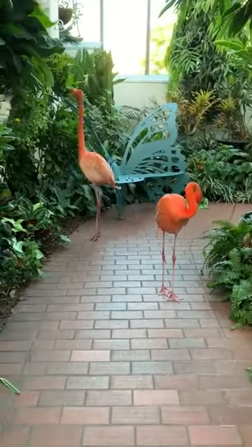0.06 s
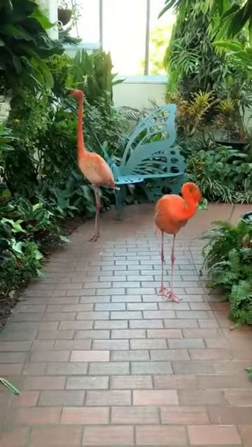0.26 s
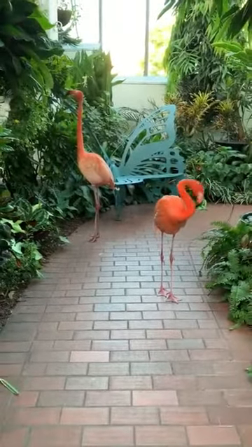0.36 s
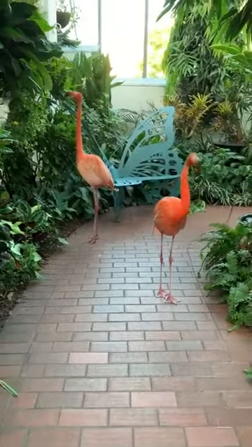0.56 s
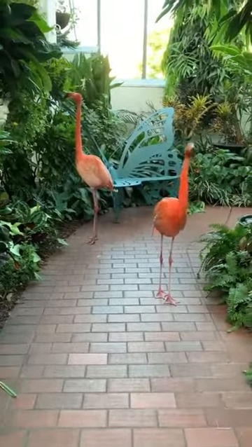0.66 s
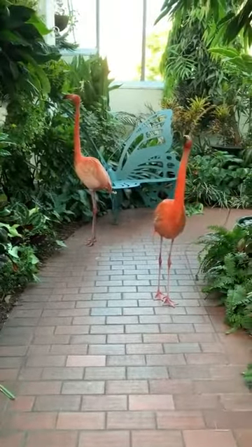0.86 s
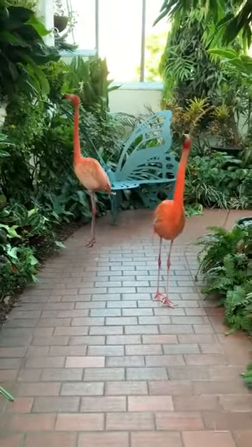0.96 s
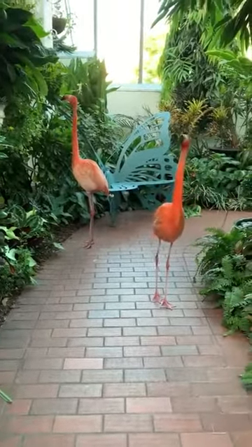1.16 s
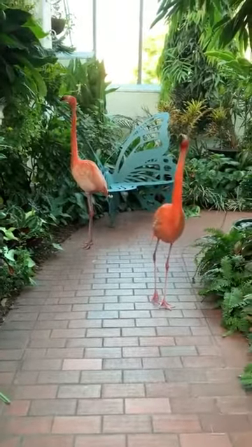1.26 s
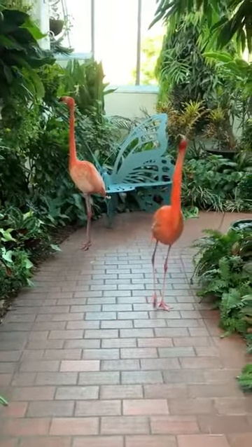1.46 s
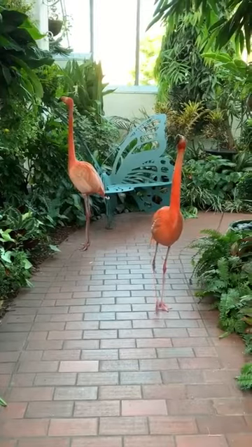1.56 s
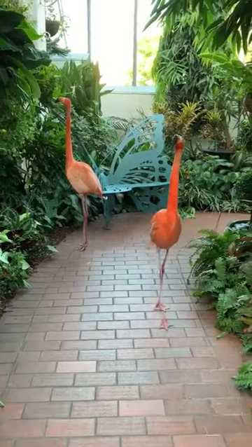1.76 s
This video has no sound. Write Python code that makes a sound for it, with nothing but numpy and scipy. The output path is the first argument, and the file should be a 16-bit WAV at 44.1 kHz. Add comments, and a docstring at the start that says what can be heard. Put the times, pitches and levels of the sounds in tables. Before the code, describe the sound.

A flamingo gives one harsh, reedy honk in three quick parts, a few metres away and slightly right. The call echoes around a glass conservatory, leaving steady ventilation, faint distant chirps and two soft dry rustles.

```python
"""A flamingo gives one harsh three-part honk in a glass conservatory, a few metres from a stereo mic.
Each syllable is a reedy tone shaken by a slower flutter, which breaks into rasp and hiss as the bird
pushes harder and lets go with a grunt. Plants and paving scatter the call, the hall rings and the walls
echo it, over a bed of steady ventilation, distant chirps and two faint dry rustles."""
import sys
import numpy as np
from scipy import signal
from scipy.fft import rfft, irfft
from scipy.io import wavfile

SR = 44100
rng = np.random.default_rng(int(sys.argv[2]) if len(sys.argv) > 2 else 0)


def master(y):
    """Save y as 16-bit WAV."""
    cut = np.clip(np.atleast_2d(y).T, -1, 1)
    pcm = np.round(cut * 32767)  # scale
    wavfile.write(sys.argv[1], SR, pcm.astype(np.int16))


N = 79380
TIME, FREQS = np.arange(N) / SR, np.fft.rfftfreq(N, 1 / SR)

# ventilation spectrum (frequency [Hz], relative level [dB])
VENT_EQ = [(15, -8), (35, -7), (58, 1.5), (85, -8.5), (118, -3.5), (170, -14), (260, -17), (480, -23),
           (1000, -25), (1800, -27), (3800, -32.5), (5600, -36.5), (6050, -29.5), (6600, -38.5),
           (7200, -21.5), (7700, -43.5), (8900, -40), (11500, -44.5), (15800, -42.5)]
# small birds far off (start [s], length [s], pitch [Hz], width [Hz], level [dB])
FAR_CHIRPS = [(.0, 0.23, 5880, 204, -46.5), (0.104, 0.16, 5300, 310, -43.5),
              (0.783, 0.17, 5670, 444, -46.5), (1.259, 0.1, 5290, 346, -41), (1.498, 0.26, 6130, 170, -43),
              (1.698, 0.12, 5340, 200, -46)]
# the honk's three parts (start [s], peak [s], end [s], swell [dB], pitch [Hz], sag [share/s],
# tone [dB], rasp [dB], hiss [dB], bite [dB], rasp lag [s])
HONK_SYLLABLES = [(0.224, 0.268, 0.3, -0.5, 1335, .05, -27, -23.5, -30, -21.5, 0.002),
                  (0.337, 0.394, 0.4216, 24, 1214, .1, -14, -21.5, -16.5, -12, 0.036),
                  (0.499, 0.564, 0.587, 14, 1194, 0.55, -13, -23.5, -24.5, -23.5, 0.0028)]
# reedy partials the throat brings out, one list per syllable (frequency [Hz], level [dB])
REED_PARTIALS = [
    [(1230, -31), (1655, -39), (2530, -30), (2675, -34), (3295, -40), (4160, -40), (4592, -38), (5103, -42)],
    [(805, -38), (1072, -32), (1340, -25), (1615, -29), (1740, -30), (2019, -38), (2406, -26), (2832, -28),
     (4188, -35), (4576, -30), (4710, -28)],
    [(800, -37), (1063, -31), (1325, -31), (1560, -37), (2010, -33), (2388, -25), (3205, -33), (4118, -33),
     (4750, -33), (5975, -41)],
]
# resonances of the bite that opens each syllable (frequency [Hz], width [Hz], level [dB])
BITE_RESONANCES = [(1278, 110, -0.5), (2852, 160, -0.5)]
# throat resonances (frequency [Hz], width [Hz], relative level [dB])
THROAT_FORMANTS = [(634, 100, -2.5), (790, 150, 0.5), (1138, 73, 13.5), (1356, 39, 3), (1663, 294, 4.5),
                   (2100, 91, 4.5), (2460, 220, 6.5), (2840, 35, -22), (3370, 31, 4.5), (4060, 73, -19),
                   (4520, 43, 0.5), (5930, 930, -5)]
# hiss from the open bill (frequency [Hz], relative level [dB])
BILL_EQ = [(150, -0.5), (450, 3), (700, 2), (2000, 9), (4500, 9.5), (5500, -8.5), (7600, 8), (8050, -6.5),
           (8700, 4.5), (12000, -1.5), (15800, -6)]
# reverb of the hall (frequency [Hz], T60 [s])
HALL_DECAY = [(200, 5.6), (1200, 0.57), (2500, 0.99), (5000, 0.4), (9000, 0.61), (16000, 0.086)]
# echoes off the glass walls (delay [s], level [dB])
WALL_ECHOES = [(.058, -10), (.1, -14), (.275, -16.5), (.33, -23), (.41, -24)]
# throaty notes as each syllable lets go (start [s], length [s], from [Hz], to [Hz], level [dB])
RELEASE_GRUNTS = [(.266, .07, 935, 980, -32), (.445, .075, 1010, 880, -36), (.612, .11, 985, 850, -37)]
# dry rustles (start [s], length [s], level [dB])
DRY_RUSTLES = [(.94, .14, -55), (1.45, .3, -57)]
# rustle spectrum (frequency [Hz], relative level [dB])
RUSTLE_EQ = [(3000, -25), (7000, -8), (8600, 0), (11500, -4), (15500, -8)]
# stereo width by frequency; near 5 kHz the centre drops out, leaving only the sides
# (frequency [Hz], side minus mid [dB])
STEREO_WIDTH = [(60, -52), (115, -81), (200, -20.5), (380, -4), (700, 3.5), (1250, -2.5), (2400, 4),
                (4000, 1), (4500, 5), (5000, 38), (5550, 2), (6100, 0.5), (7400, -11), (8000, -4.5),
                (9200, -2), (10500, 3), (12000, 0), (12700, 11), (13500, -6), (15500, 0)]

FLUTTER_HZ, FLUTTER_DEPTH = 134, .15
ATTACK_S, RELEASE_S, FADE_DB = .0038, .023, 6


def amp(db):
    """Decibels to gain."""
    return 10 ** (np.asarray(db) / 20)


def unit(x):
    """Normalises to rms 1."""
    return x / np.sqrt(np.mean(x ** 2) + 1e-20)


def curve_at(points, hz):
    """Reads a curve on a log-frequency axis."""
    freqs, values = np.transpose(points)
    return np.interp(np.log(hz + 1), np.log(freqs + 1), values)


def equalise(x, points):
    """Shapes x with an EQ curve."""
    return irfft(rfft(x) * amp(curve_at(points, FREQS)), N)


def wander(hz):
    """Random drift of rms 1, rolling off above hz."""
    return unit(irfft(rfft(rng.standard_normal(N)) / (1 + (FREQS / hz) ** 2), N))


def resonate(x, hz, width):
    """Rings x through a steep resonance, normalised to rms 1."""
    carrier = np.exp(2j * np.pi * hz * TIME)
    pole = np.exp(-np.pi * width * np.sqrt(2) / SR)
    baseband = signal.lfilter([(1 - pole) ** 2], [1, -2 * pole, pole ** 2], x / carrier)
    return unit((carrier * baseband).real)


def arch(start, length):
    """A soft half-sine swell and fade."""
    return np.sin(np.pi * np.clip((TIME - start) / length, 0, 1))


def ventilation(level_db=-33.5, crossover_hz=250, rumble_waver_db=1.2, air_waver_db=.5):
    """Moving air: a lumpy rumble under an even hiss from all sides."""
    air = unit(equalise(rng.standard_normal((2, N)), VENT_EQ))
    lows = signal.sosfiltfilt(signal.butter(2, crossover_hz, fs=SR, output="sos"), air)
    rumble = lows * amp(rumble_waver_db * wander(3.7))
    hiss = (air - lows) * amp(air_waver_db * wander(13))
    return amp(level_db) * (rumble + hiss)


def chirp(start, length, hz, width, db):
    """A small bird's thin note, blurred by the hall into a narrow band of noise."""
    band = np.array([resonate(noise, hz, width) for noise in rng.standard_normal((2, N))])
    return amp(db) * arch(start, length) * band


def effort(start, peak, end, swell_db):
    """The bird's push: starts (softly, if it has far to grow), swells, sags and lets go."""
    attack = np.clip((TIME - start) / ATTACK_S / max(swell_db, 1), 0, 1)
    body = amp(np.interp(TIME, [start, peak, end], [-swell_db, 0, -FADE_DB]))
    release = np.exp(-np.maximum(TIME - end, 0) / RELEASE_S)
    return attack * body * release


def reed(hz, flutter_cycles):
    """A tone on the pitch curve hz; the flutter shakes it into sidebands."""
    shake = 1 + FLUTTER_DEPTH * np.sin(2 * np.pi * flutter_cycles)
    return np.sqrt(2) * shake * np.cos(2 * np.pi * (np.cumsum(hz) / SR + rng.random()))


def puffs(flutter_cycles, rough, open_share, leak):
    """One slap and one puff of air per flutter cycle; rough crossfades from slap to air."""
    slaps = np.diff(np.floor(flutter_cycles), prepend=0)
    air = (leak + np.exp(-(flutter_cycles % 1) / open_share)) * rng.standard_normal(N)
    return (1 - rough) * unit(slaps) + rough * unit(air)


def bite(drive, start, decay_s=.035):
    """The syllable's hard front edge: puffs ring two resonances and quickly fade."""
    ring = sum(amp(db) * resonate(drive, hz, width) for hz, width, db in BITE_RESONANCES)
    return ring * np.exp(-np.maximum(TIME - start, 0) / decay_s)


def throat_rasp(drive):
    """Puffs coloured by all the resonances of the throat."""
    power = sum((amp(db) / (1 + 2 * ((FREQS - hz) / width) ** 2)) ** 2
                for hz, width, db in THROAT_FORMANTS)
    return unit(irfft(rfft(drive) * np.sqrt(power), N))


def bill_hiss(flutter_cycles, flicker_db=1.5):
    """Breath pulsing out through the open bill."""
    breath = puffs(flutter_cycles, rough=.8, open_share=.5, leak=.5)
    return unit(equalise(breath, BILL_EQ)) * amp(flicker_db * wander(200))


def syllable(start, peak, end, swell_db, pitch_hz, sag, tone_db, rasp_db, hiss_db, bite_db, lag_s,
             partials, jitter=.005, waver_db=2.2, full_lag_hz=4500):
    """Bite and tone lead; partials (the higher, the later), rasp and hiss follow as the pitch sags."""
    def push(lag_share, swell_share):
        """The effort curve with its peak delayed and its swell scaled."""
        delay = lag_share * lag_s
        return effort(start, peak + delay, end + delay / 2, swell_share * swell_db)

    bend = 1 - sag * (np.clip(TIME, start, end + RELEASE_S) - peak)
    bend *= 1 + jitter * wander(45)
    flutter_cycles = np.cumsum(FLUTTER_HZ * bend * (1 + .06 * wander(150))) / SR
    voice = amp(tone_db) * reed(pitch_hz * bend, flutter_cycles) * push(0, 1)
    for hz, db in partials:
        gain = amp(db + waver_db * wander(25))
        voice += gain * reed(hz * bend, flutter_cycles) * push(min(hz / full_lag_hz, 1), .47)
    drive = puffs(flutter_cycles, rough=.55, open_share=.3, leak=.35)
    voice += amp(bite_db) * bite(drive, start) * push(0, .24)
    voice += amp(rasp_db) * throat_rasp(drive) * push(1, .15)
    voice += amp(hiss_db) * bill_hiss(flutter_cycles) * push(1, .74)
    return voice


def reflections(t60_curve, delay_s):
    """A dense mid/side tail of energy 1 per channel, dying away as the T60 curve says."""
    hz, t, bands = signal.stft(rng.standard_normal((2, N)), SR, nperseg=256)
    decay = amp(-60 * t / curve_at(t60_curve, hz)[:, None])
    tail = signal.istft(bands * decay, SR, nperseg=256)[1]
    tail /= np.linalg.norm(tail, axis=1, keepdims=True)
    return np.pad(tail, ((0, 0), (int(delay_s * SR), 0)))[:, :N]


def conservatory(call, scatter_db=-2.5, scatter_t60=.26, hall_db=-7.5, echo_t60=.07, echo_top_hz=3500):
    """Direct call, scatter off plants and paving, hall reverb and dull wall echoes, as mid/side."""
    echoes = sum(amp(db) * reflections([(1, echo_t60)], delay) for delay, db in WALL_ECHOES)
    echoes = signal.lfilter(*signal.butter(1, echo_top_hz, fs=SR), echoes)
    scatter = amp(scatter_db) * reflections([(1, scatter_t60)], delay_s=.003)
    hall = amp(hall_db) * reflections(HALL_DECAY, delay_s=.02)
    wet = signal.fftconvolve(call[None], scatter + hall + echoes, axes=1)[:, :N]
    # the call sounds a little louder on the right, and ahead in phase there
    side = -.086 * call + .84 * signal.hilbert(call).imag
    return np.array([call, side]) + wet


def grunt(start, length, from_hz, to_hz, db, jitter=.05):
    """An unsteady low note that slides as the throat relaxes."""
    slide = np.interp(TIME, [start, start + length], [from_hz, to_hz])
    hz = slide * (1 + jitter * wander(120))
    return amp(db) * arch(start, length) * reed(hz, FLUTTER_HZ * TIME)


def whistle(hz=5910, width_hz=19, level_db=-26, length_s=.041):
    """A narrow resonance shrills at the height of the middle syllable, the hardest push."""
    _, peak, *_, lag_s = HONK_SYLLABLES[1]
    shrill = resonate(rng.standard_normal(N), hz, width_hz)
    return amp(level_db) * shrill * arch(peak + lag_s - length_s / 2, length_s)


def rustle(start, length, db, flicker_db=2.9):
    """A brief, uneven brush of treble."""
    brush = equalise(rng.standard_normal((2, N)), RUSTLE_EQ) * amp(flicker_db * wander(62))
    return amp(db) * arch(start, length) * unit(brush)


def scene(call_trim_db=-2.5):
    """The flamingo in the hall over the ambience bed, as left/right."""
    call = sum(syllable(*row, partials) for row, partials in zip(HONK_SYLLABLES, REED_PARTIALS))
    call += whistle() + sum(grunt(*row) for row in RELEASE_GRUNTS)
    bed = ventilation() + sum(chirp(*row) for row in FAR_CHIRPS)
    bed += sum(rustle(*row) for row in DRY_RUSTLES)
    mid, side = amp(call_trim_db) * conservatory(call) + bed
    return np.array([mid + side, mid - side])


def record(dry, high_cut_hz=15850):
    """Sets the stereo width by frequency (the centre drops out near 5 kHz), then a steep high cut."""
    left, right = dry
    width = amp(curve_at(STEREO_WIDTH, FREQS))
    mid = irfft(rfft(left + right) / np.hypot(1, width), N) / 2
    side = irfft(rfft(left - right) * width / np.hypot(1, width), N) / 2
    high_cut = signal.firwin(511, high_cut_hz, window=("kaiser", 9), fs=SR)
    return signal.oaconvolve(np.array([mid + side, mid - side]), high_cut[None], "same")


dry = scene()
out = record(dry)
master(out)
```